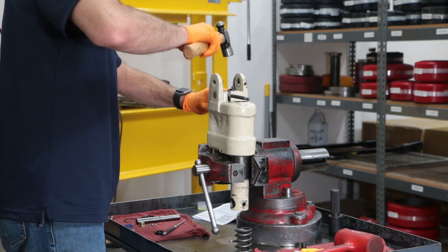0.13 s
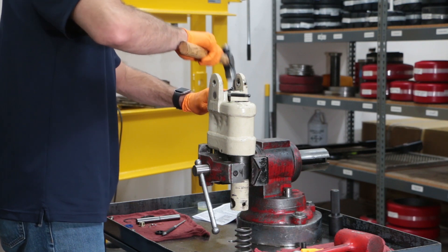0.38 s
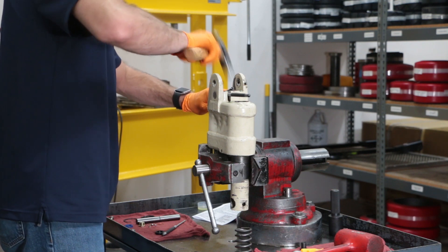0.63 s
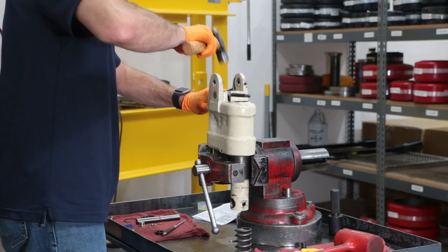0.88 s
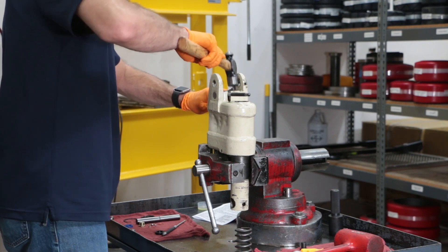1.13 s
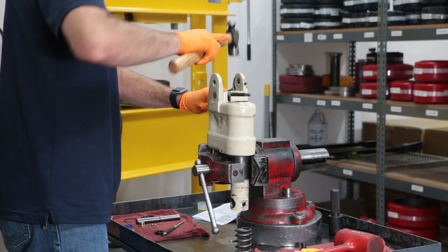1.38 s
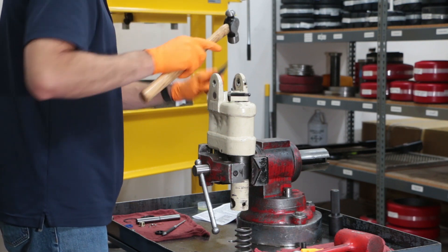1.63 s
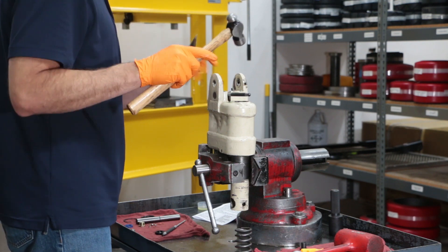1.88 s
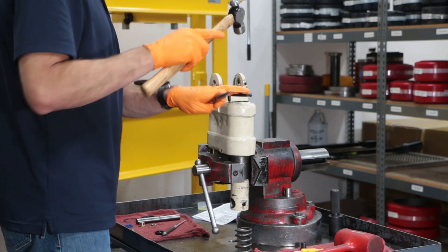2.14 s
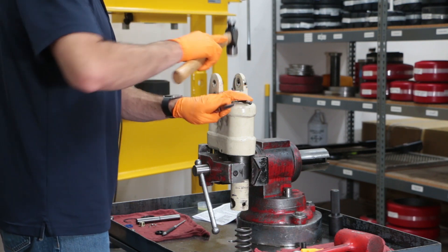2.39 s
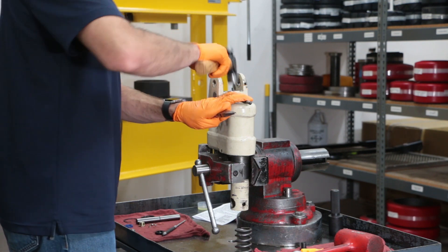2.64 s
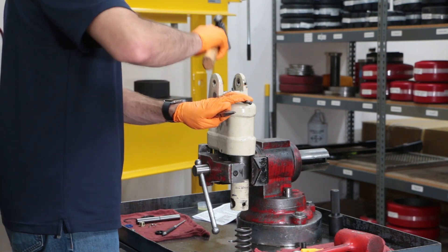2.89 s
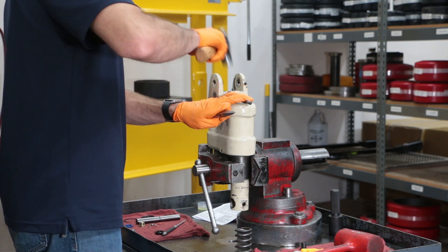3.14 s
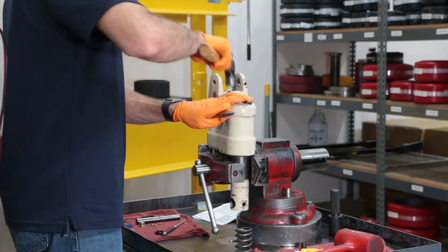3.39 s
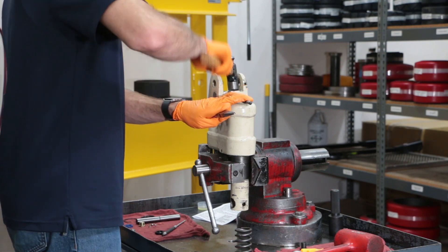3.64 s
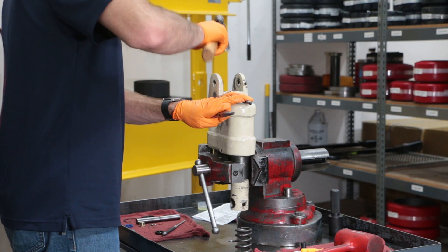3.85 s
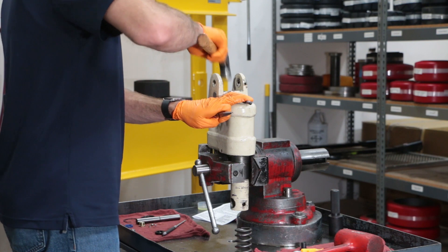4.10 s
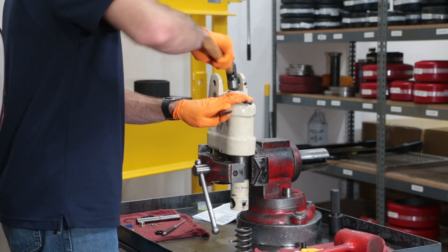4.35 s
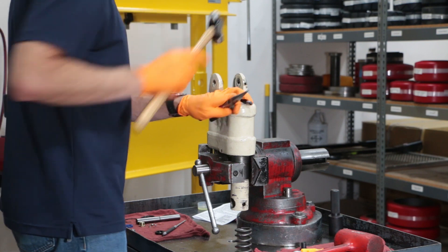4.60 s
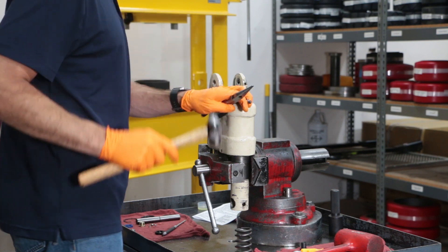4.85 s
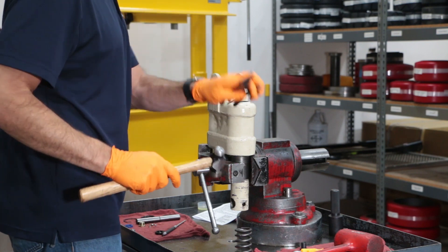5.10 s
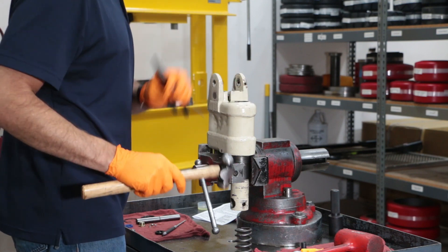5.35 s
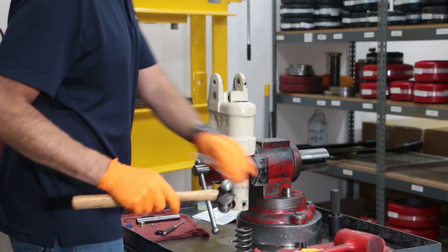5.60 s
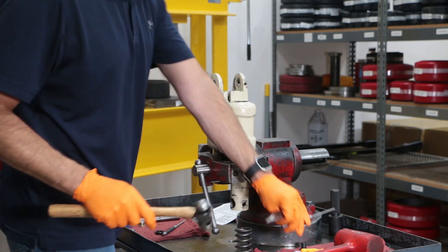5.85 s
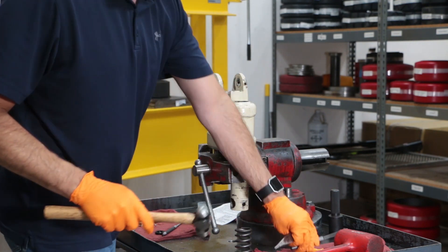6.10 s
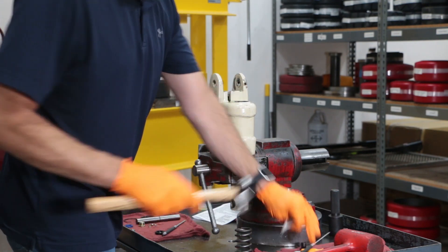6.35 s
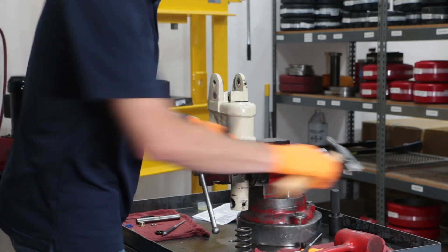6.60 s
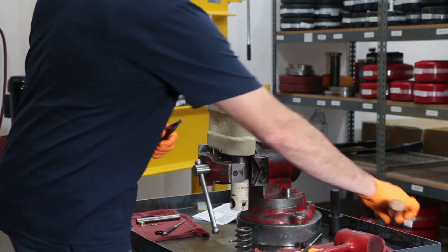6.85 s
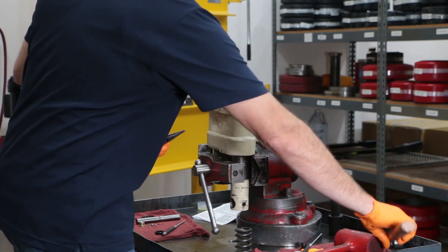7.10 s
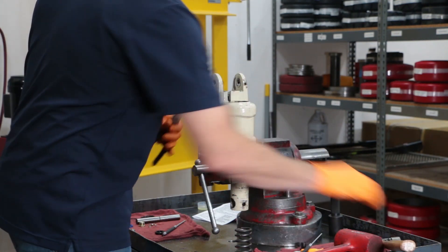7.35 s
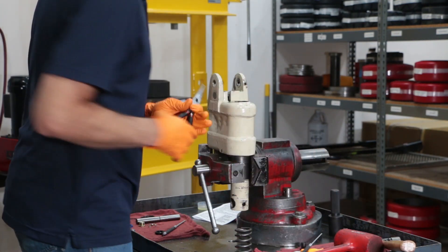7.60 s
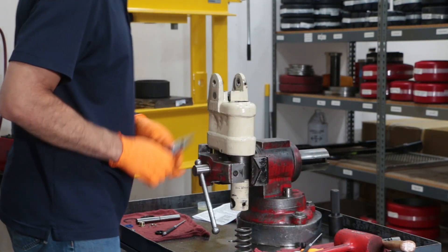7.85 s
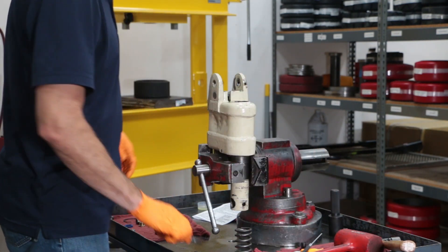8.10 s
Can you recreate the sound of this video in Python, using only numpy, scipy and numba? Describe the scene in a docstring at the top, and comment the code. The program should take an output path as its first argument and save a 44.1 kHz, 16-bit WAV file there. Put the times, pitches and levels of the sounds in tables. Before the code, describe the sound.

Bright, hard hammer cracks with short high steel ringing come about three a second, in a run of four and then six. Between them is quiet room air and a tiny tap. Afterwards thin steel clinks, a thicker punch is picked up with two clicks, and dull knocks land on the bench top. Hard-walled workshop, low ventilation noise, nearby microphone with blows compressed and clipped.

```python
"""A hammer blow already rings as the scene opens: a small hammer drives a pin punch into a clamped
steel housing. Noise bursts crack and decaying modes ring, in a hard-walled workshop with ventilation noise.
A thin punch clinks before the second run of blows; then steel slides, small steel pieces clink, an arm
swishes past and knocks sound on the bench top as the hammer is laid down. The camera's gain control
flattens the first part of each loud ring."""
import sys
import numpy as np
from scipy import signal
from scipy.fft import rfft, irfft
from scipy.io import wavfile
from scipy.ndimage import uniform_filter1d
from numba import njit

SR = 44100
rng = np.random.default_rng(int(sys.argv[2]) if len(sys.argv) > 2 else 0)


def generate_wav(sig):
    """Save sig (samples, or channels by samples) to the path in sys.argv[1] as 16-bit PCM at SR."""
    pcm = np.round(np.clip(np.atleast_2d(sig).T, -1, 1) * 32767).astype(np.int16)
    wavfile.write(sys.argv[1], SR, pcm)


def volts(x):
    """Linear amplitude factor 10**(x/20) for a level x in dB, scalar or array-like."""
    e = np.asarray(x, float) / 20
    return 10 ** e


N = 362943
LEAD = 4410  # samples computed before the start, for the blow already ringing

# hammer blows: start_s, force_db, then the answers relative to force: punch_db, jaws_db, bench_db
BLOWS = [(-.03, -7.5, -17, -39, -31), (0.3711, -1, -21, -38, -27.5), (0.7582, 0, -22, -23.5, -22.5),
         (1.1195, 0, -22.5, -6.5, -23.5), (2.765, -7.5, -35, -35, -28.5), (3.0649, 0, -24.5, -21, -26),
         (3.379, -0.5, -16.5, -17.5, -26.5), (3.7009, 1, -45, -17.5, -27.5), (4.0334, 9, -17.5, -16.5, -32),
         (4.3751, 6, -27, -18.5, -30.5)]
# spectrum of the hammer's contact noise: frequency_hz, relative_density_db
CRACK_SPECTRUM = [(88, -14.5), (150, -3), (821, -5), (1390, -4.5), (3220, -2), (4080, 0.5), (5680, -0.5),
                  (7470, -2.5), (8730, -0.5), (14200, -12), (16000, -24)]
# modes of the struck steel housing: frequency_hz, relative_level_db, t60_s
HOUSING_MODES = [(1885, 0, 0.084), (4030, 0.5, 0.089), (4125, -7, 0.49), (4190, 4.5, 0.08),
                 (4000, -17.5, 0.13), (4540, -2.5, 0.082), (5068, -18, 0.97), (5850, -18.5, 0.31),
                 (7570, -12, 0.15), (7580, -8, 0.19), (7585, -4.5, 0.12), (8100, -5.5, 0.13),
                 (7634, 3.5, 0.14), (9720, -8.5, 0.18), (11480, -17.5, 0.037), (12270, -9.5, 0.099),
                 (12700, -13, 0.18), (13200, -11.5, 0.08), (14200, -11, .07)]
# modes of the punch under the hammer: frequency_hz, relative_level_db, t60_s
PUNCH_MODES = [(4930, -7, 0.35), (4862, -8, 0.28)]
# modes of the driven pin: frequency_hz, relative_level_db, t60_s
PIN_MODES = [(5326, -19.5, 0.4), (6085, -2, 0.091), (9740, -6, 0.11), (9360, -4, 0.082), (11330, -4, 0.072)]
# modes of the vice jaws: frequency_hz, relative_level_db, t60_s
JAW_MODES = [(643, 6, 0.025), (704, -7.5, 0.0395), (942, -0.5, 0.027), (1464, -6.5, 0.059)]
# low modes of the bench: frequency_hz, relative_level_db, t60_s
BENCH_MODES = [(166.5, -11.5, 0.47), (205.4, -4.5, 0.28), (246, -7, 0.31), (262.8, -5, 0.37),
               (333.5, -3, 0.19)]
HOUSING_DB, HOUSING_GROWTH = -21.5, 0.92  # ring at force 0 dB, dB of ring per dB of force
PIN_DB, PIN_GROWTH = -20.5, 2.4  # the same for the pin, at punch_db 0
PIN_WITH_PUNCH = 0.16  # dB per dB: the pin also rings more when the punch is held loosely
UNEVEN_DB = 3.5  # greatest chance deviation of each mode, either way, drawn anew for each contact

# reverberation time: frequency_hz, t60_s
ROOM_T60 = [(150, 0.59), (500, 0.43), (1500, 0.59), (4000, 0.82), (8000, 0.65), (15000, 0.47)]
# left-right correlation of the reverberant tail: frequency_hz, correlation
ROOM_CORRELATION = [(60, 0.98), (180, 1), (550, 0.94), (1650, 0.74), (4970, 0.011), (15000, 0.06)]

# ventilation noise spectrum: frequency_hz, relative_density_db
AIR_SPECTRUM = [(12, -28), (20, -9.5), (65, -11), (130, -4.5), (434, -16), (527, -17.5), (718, -14),
                (849, -21), (976, -13), (1150, -17), (1910, -17.5), (6360, -27.5), (9670, -29),
                (14700, -34), (16000, -40)]
# left-right correlation of the ventilation noise: frequency_hz, correlation
AIR_CORRELATION = [(60, 0.98), (180, 0.92), (550, 0.51), (1650, 0.41), (4970, -0.034), (15000, -0.76)]
# wavering tones: frequency_hz, level_db, bandwidth_hz
HUMS = [(60.3, -57, 9.8), (113.3, -58, 4.5), (9600, -86.5, 9.2)]
AIR_DB, SWELL_DB = -52, 1.5  # noise level, rms of its slow wander in level

# small steel pieces clinking, a thin punch, then from 6.278 s another piece:
# start_s, ring_db, tick_db, tilt_db_per_octave
SMALL_CLINKS = [(2.21, -57.5, -50, 14), (5.102, -30.5, -44, -1), (5.134, -34, -34, 9),
                (5.16, -40.5, -41, 1.5), (6.278, -64, -24.5, 5), (6.31, -30, -29, -6),
                (6.352, -32, -40, -10)]
# modes of the small steel pieces: frequency_hz, relative_level_db, t60_s
SMALL_STEEL_MODES = [(2360, -19, 0.067), (3480, -2.5, 0.052), (4610, -11, 0.022), (6200, -25, 0.03),
                     (8620, -14.5, 0.036), (9825, -8.5, 0.078), (11100, -23, 0.058)]
# a barely audible faint sound at 5.95 s; all other rows, hammer or hand knocking on the bench top:
# start_s, ring_db, tick_db, tilt_db_per_octave
KNOCKS = [(2.312, -40, -41, 0), (5.95, -68.5, -72, -10), (7.033, -24, -34.5, 2), (7.122, -31, -18, 1.5),
          (7.155, -42, -21.5, -4.5), (7.352, -11, -18.5, 0.5), (7.383, -37.5, -27, -8),
          (7.42, -22.5, -26.5, -3.5), (7.465, -27.5, -32, -2.5), (7.51, -39.5, -21.5, -8),
          (7.815, -42.5, -33.5, -1.5)]
# modes of the bench top: frequency_hz, relative_level_db, t60_s
BENCH_TOP_MODES = [(255, -17.5, 0.024), (342, -15.5, 0.066), (483.4, -12, 0.042), (733, 0, 0.032),
                   (774, -1.5, 0.025), (881, -4.5, 0.03), (978, -1.5, 0.039), (1081, -1, 0.043),
                   (1301, -7.5, 0.053), (1680, -15.5, 0.13), (1840, -5.5, 0.022), (2230, -9, 0.027),
                   (2880, -15.5, 0.018), (4000, -16, 0.012)]
# a thick punch lifted off the bench: start_s, ring_db, tick_db, tilt_db_per_octave
THICK_CLINKS = [(6.412, -30, -30.5, 1), (6.445, -30.5, -31, 2.5)]
# modes of the thick punch: frequency_hz, relative_level_db, t60_s
THICK_PUNCH_MODES = [(2930, -14.5, 0.069), (3710, -14, 0.031), (4900, -3.5, 0.15), (6340, -2.5, 0.021),
                     (7470, -1.5, 0.049), (9910, -8.5, 0.04), (10920, -10.5, 0.035), (13100, -11, 0.033)]
# contact noise of clinks and knocks before tilt: frequency_hz, relative_density_db
TICK_SPECTRUM = [(150, 18), (700, 10), (2000, 2), (5000, -3.5), (9000, -18), (16000, -37.5)]

# steel sliding on steel: start_s, length_s, level_db before fading, fade_db over the stroke, pitch_factor
SLIDES = [(4.931, .17, -56.5, -0.5, 1.22), (7.116, 0.16, -38, -21, 1.01)]
# sliding noise at pitch_factor 1: frequency_hz, relative_density_db
SLIDE_SPECTRUM = [(880, -14), (1500, -4), (2270, -11), (3220, 3.5), (6120, -21), (7840, 5), (9280, -9.5),
                  (13400, -17.5), (14200, -13.5), (15400, -11), (16000, -33.5)]
SLIDE_ATTACK_S = 0.019

# noise of the passing arm: frequency_hz, relative_density_db
SWISH_SPECTRUM = [(47, -48), (80, -28), (155, 6.5), (323, -10.5), (464, -3), (551, -10), (2500, -38.5),
                  (3250, -75), (5500, -120)]
SWISH_S, SWISH_DB = 6.89, -44  # moment of nearest approach, level there
APPROACH_S, LEAVING_S = 0.045, 0.03  # standard deviations of the two halves of the sweep


def read(points, hz):
    """Interpolation of a table on a logarithmic frequency axis."""
    f, value = np.transpose(points)
    return np.interp(np.log(hz + 1), np.log(f + 1), value)


def evened(x):
    """Normalisation to unit rms."""
    return x / np.sqrt(np.mean(x ** 2) + 1e-20)


def add(mix, start_s, sound):
    """Superposition: a sound is summed into the mix in place, cut where the mix ends."""
    part = mix[round(start_s * SR) + LEAD:][:len(sound)]
    part += sound[:len(part)]


def spectrum_gain(points, hz, tilt_db):
    """Spectral shaping: a table's gain, tilted about 3 kHz in dB per octave."""
    return volts(read(points, hz) + tilt_db * np.log2((hz + 50) / 3000))


def burst(points, rise_s, fall_s, tilt_db=0):
    """Impact noise: alternating projection gives a short burst both its spectrum and its envelope."""
    t = np.arange(2048) / SR
    gain = spectrum_gain(points, np.fft.rfftfreq(2048, 1 / SR), tilt_db)
    envelope = (1 - np.exp(-(t / rise_s) ** 2)) * np.exp(-t / fall_s)
    out = rng.standard_normal(len(t)) * envelope
    for _ in range(6):
        out = irfft(gain * np.exp(1j * np.angle(rfft(out))))  # keep the phase, impose the spectrum
        power = abs(uniform_filter1d(out ** 2, size=48))
        out = out * envelope / np.sqrt(power + 1e-3 * np.max(out ** 2))
    return evened(out) * np.sqrt(np.mean(envelope ** 2))


def ring(modes, split, tilt_db=0):
    """Modal synthesis: damped sines in close, beating trios; harder contact tilts them about 3 kHz."""
    hz, db, t60 = np.transpose(modes + modes + modes)[:, :, None]
    detune, phase, chance = rng.uniform(-1, 1, (3, len(hz), 1))
    t = np.arange(SR // 2) / SR
    uneven_db = UNEVEN_DB * np.tile(chance[:len(modes)], (3, 1))  # shared by the three sines of a mode
    level_db = db + uneven_db + tilt_db * np.log2(hz / 3000) - 60 * t / t60
    waves = volts(level_db) * np.sin(2 * np.pi * hz * (1 + split * detune) * t + np.pi * phase)
    return 0.75 * waves.sum(0) * np.minimum(t / 0.00068, 1)


def hammering(mix):
    """Impact excitation: each blow cracks, then housing, punch, pin, vice and bench ring at their modes."""
    for start_s, force_db, punch_db, jaws_db, bench_db in BLOWS:
        housing_db = HOUSING_DB + HOUSING_GROWTH * force_db
        pin_db = PIN_DB + PIN_GROWTH * force_db + PIN_WITH_PUNCH * punch_db
        add(mix, start_s, volts(force_db) * burst(CRACK_SPECTRUM, rise_s=0.0005, fall_s=0.0024))
        add(mix, start_s, volts(housing_db) * ring(HOUSING_MODES, 0.0042))
        add(mix, start_s, volts(force_db + punch_db) * ring(PUNCH_MODES, 0.00025))
        add(mix, start_s, volts(pin_db) * ring(PIN_MODES, 0.0019))
        # the push reaches vice and bench later
        add(mix, start_s + 0.001487, volts(force_db + jaws_db) * ring(JAW_MODES, 0.062))
        add(mix, start_s + 0.0029, volts(force_db + bench_db) * ring(BENCH_MODES, 0.04))


def pair(count, correlation, field_db, size):
    """Partial coherence: two noise channels built from short-time spectra, correlated as tabulated."""
    hz = np.fft.rfftfreq(size, 1 / SR)
    t = np.arange(count * 4 // size + 5) * size / 4 / SR
    a, b, c, d = rng.standard_normal((len(t), len(hz), 4)).T
    alike = np.clip(read(correlation, hz), -1, 1)[:, None]
    left = a + 1j * b
    right = alike * left + np.sqrt(1 - alike ** 2) * (c + 1j * d)
    spectra = np.array([left, right]) * volts(field_db(hz[:, None], t))
    return signal.istft(spectra, nperseg=size, noverlap=size * 3 // 4)[1][:, :count]


def workshop(x):
    """Room impulse response: direct sound, early echoes off bench and shelves, and a diffuse tail."""
    tail = pair(SR, ROOM_CORRELATION, lambda hz, t: -60 * t / read(ROOM_T60, hz), size=256)
    t = np.arange(SR) / SR
    tail = tail * (1 - np.exp(-(t / 0.0077) ** 2))  # the tail builds up
    response = volts(-0.5) * tail / np.linalg.norm(tail[0])
    response[:, 0] += 1  # direct sound
    # eight delays in samples, each with a small offset of its own in either channel
    echoes = rng.integers(60, 900, 8) + rng.integers(0, 4, (2, 8))
    echo_gain = volts(-4.5 - 400 * echoes / SR) * rng.choice([-1., 1.], 8)
    np.put_along_axis(response, echoes, echo_gain, 1)
    balance = volts([[-0.7], [0.7]])  # left, right
    return signal.fftconvolve(x[None], response * balance, axes=1)[:, LEAD:LEAD + N]


def air():
    """Broadband and narrowband noise: ventilation with a slow swell, and wavering tones."""
    t = np.arange(N) / SR
    swell_hz = np.geomspace(0.3, 6, num=16)
    swell = evened(sum(np.sin(2 * np.pi * (f * t + rng.random())) / np.sqrt(f) for f in swell_hz))
    noise = evened(pair(N, AIR_CORRELATION, lambda hz, t: read(AIR_SPECTRUM, hz) + 0 * t, size=2048))
    out = volts(AIR_DB + SWELL_DB * swell) * noise
    for hz, db, width_hz in HUMS:
        pole = np.exp(-np.pi * width_hz / SR)
        waver = signal.lfilter([1], [1, -pole], rng.standard_normal(N) + 1j * rng.standard_normal(N))
        out += volts(db) * evened((waver * np.exp(2j * np.pi * hz * t)).real)
    return out


def clinks_and_knocks(mix):
    """Impact excitation in handling: each contact gives a noise tick and a modal ring."""
    for events, modes, split in ((SMALL_CLINKS, SMALL_STEEL_MODES, 0.0006),
                                 (KNOCKS, BENCH_TOP_MODES, 0.025),
                                 (THICK_CLINKS, THICK_PUNCH_MODES, 0.001)):
        for start_s, ring_db, tick_db, tilt_db in events:
            add(mix, start_s, volts(ring_db) * ring(modes, split, tilt_db))
            add(mix, start_s, volts(tick_db) * burst(TICK_SPECTRUM, 0.001, 0.0036, tilt_db))


def coloured(points, count, tilt_db=0):
    """Spectral filtering: white noise shaped to a spectrum, at unit rms."""
    gain = spectrum_gain(points, np.fft.rfftfreq(count, 1 / SR), tilt_db)
    return evened(irfft(rfft(rng.standard_normal(count)) * gain, count))


def gritty(spectrum, count):
    """Random amplitude modulation: coloured noise whose level flickers every few milliseconds."""
    flicker = evened(uniform_filter1d(rng.standard_normal(count), size=120))
    return volts(2.9 * flicker) * coloured(spectrum, count)


def slides(mix):
    """Friction noise: steel sliding on steel, its spectrum scaled by the pitch of the sliding piece."""
    t = np.arange(SR // 2) / SR
    for start_s, length_s, level_db, fade_db, pitch in SLIDES:
        stroke = np.minimum(t / SLIDE_ATTACK_S, 1) * (t < length_s)
        stroke = stroke * volts(level_db + fade_db * (t / length_s) ** 1.3)
        spectrum = [(hz * pitch, db) for hz, db in SLIDE_SPECTRUM]
        add(mix, start_s, stroke * gritty(spectrum, len(t)))


def swish(mix):
    """Aerodynamic noise: an arm sweeps past, swelling and fading as two unequal Gaussian halves."""
    away = np.arange(SR // 2) / SR - 0.25  # seconds from the nearest approach
    sweep = np.exp(-0.5 * (away / np.where(away < 0, APPROACH_S, LEAVING_S)) ** 2)
    add(mix, SWISH_S + away[0], volts(SWISH_DB) * sweep * gritty(SWISH_SPECTRUM, len(away)))


def scene():
    """Superposition and convolution: all objects sound in the room, over the air noise."""
    objects = np.zeros(N + LEAD)
    hammering(objects)
    clinks_and_knocks(objects)
    slides(objects)
    swish(objects)
    # deep bass of everything but the air noise is cut below 130 Hz
    bass_cut = signal.butter(3, 130, "highpass", fs=SR, output="sos")
    return workshop(signal.sosfilt(bass_cut, objects)) + air()


@njit
def follow(over_db, attack, release_db):
    """Envelope following: gain reduction rises within milliseconds and recovers at a steady dB rate."""
    out, now = np.zeros(len(over_db)), 0.
    for i in range(len(over_db)):
        if over_db[i] > now:
            now = now + attack * (over_db[i] - now)
        else:
            now = max(now - release_db, over_db[i])
        out[i] = now
    return out


def top_cut(x):
    """Nothing passes above the cut-off."""
    return signal.sosfilt(signal.butter(12, 16410, fs=SR, output="sos"), x)


def record(dry):
    """Dynamic compression: gain control comes too late for the crack; peaks past full scale clip."""
    smooth = np.exp(-1 / (0.0079 * SR))  # 7.9 ms power average
    power = signal.lfilter([1 - smooth], [1, -smooth], (dry ** 2).mean(0))
    power_db = 10 * np.log10(power + 1e-12)
    over_db = 0.99 * np.maximum(power_db + 16.0, 0)  # threshold -16 dB, nearly a limiter
    reduction_db = follow(over_db, 1 / (0.0013 * SR), 90. / SR)  # attack 1.3 ms, release 90 dB/s
    mix = np.clip(dry * volts(-reduction_db), -1, 1)
    return top_cut(mix)


dry = scene()
out = record(dry)
generate_wav(out)
```